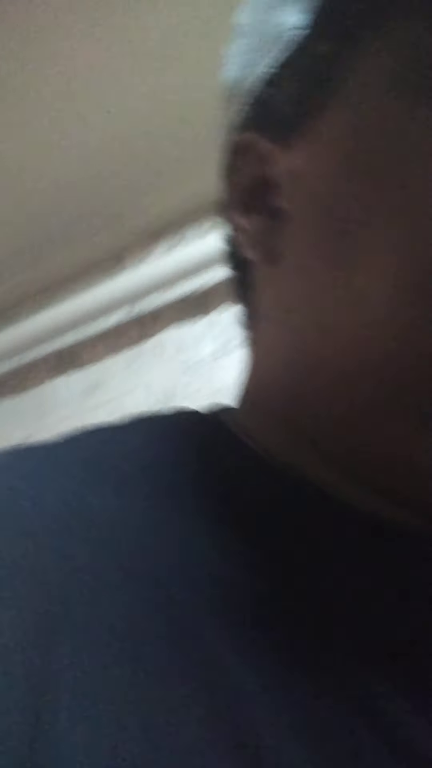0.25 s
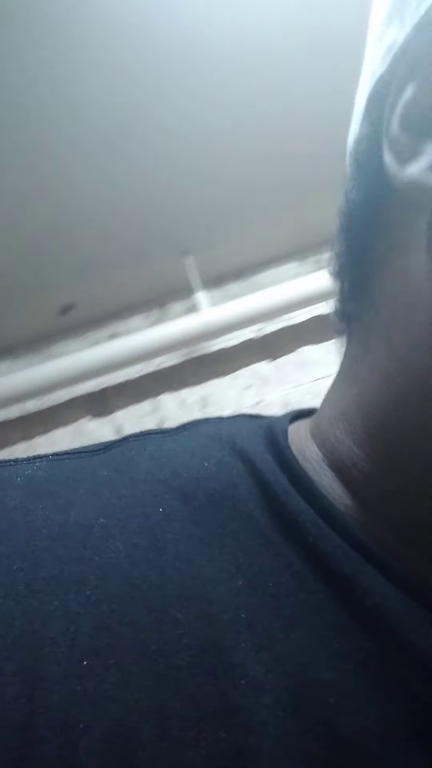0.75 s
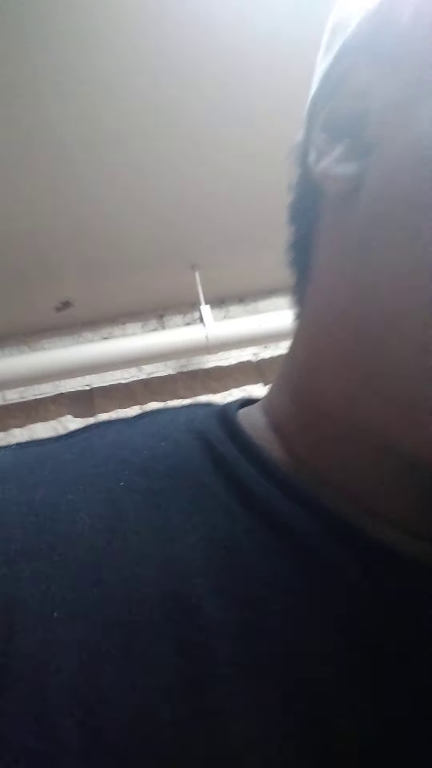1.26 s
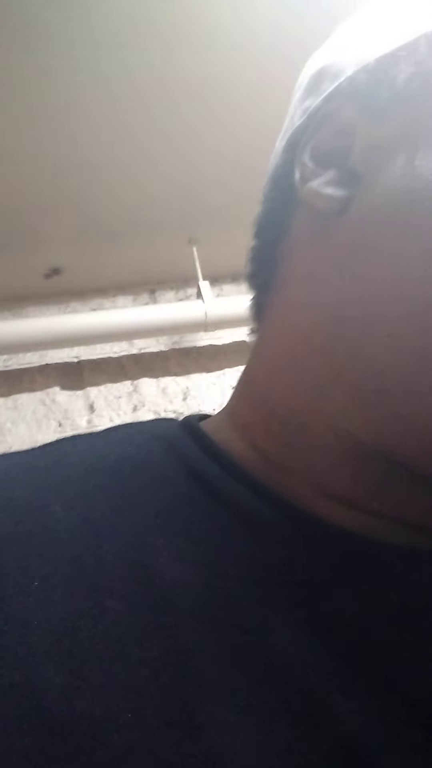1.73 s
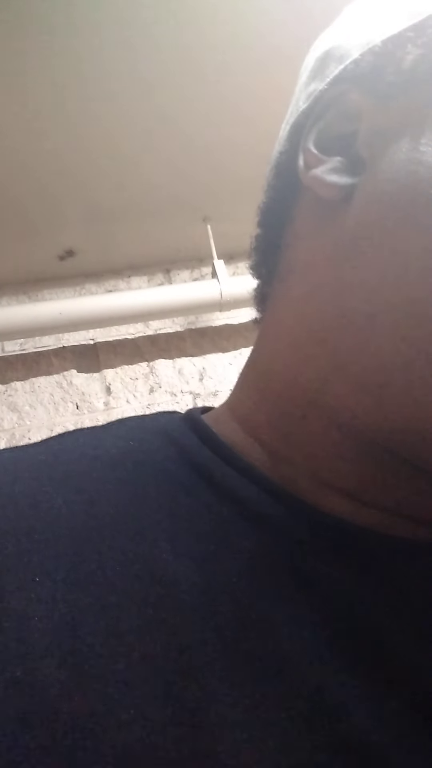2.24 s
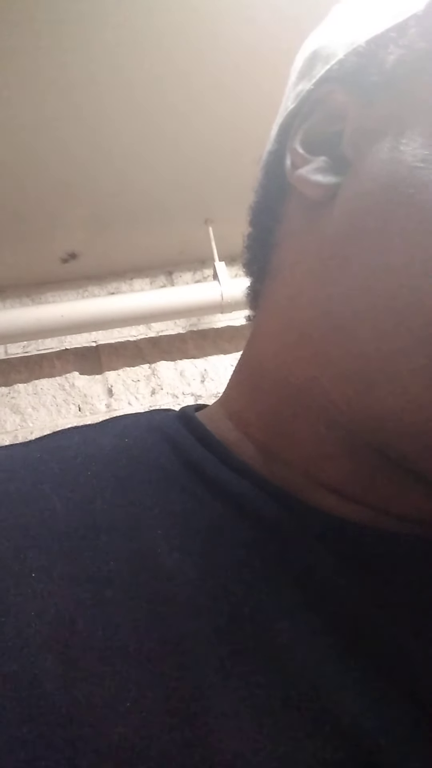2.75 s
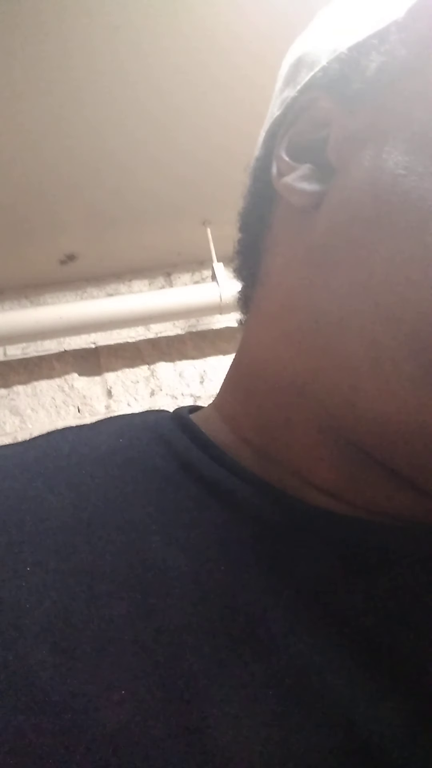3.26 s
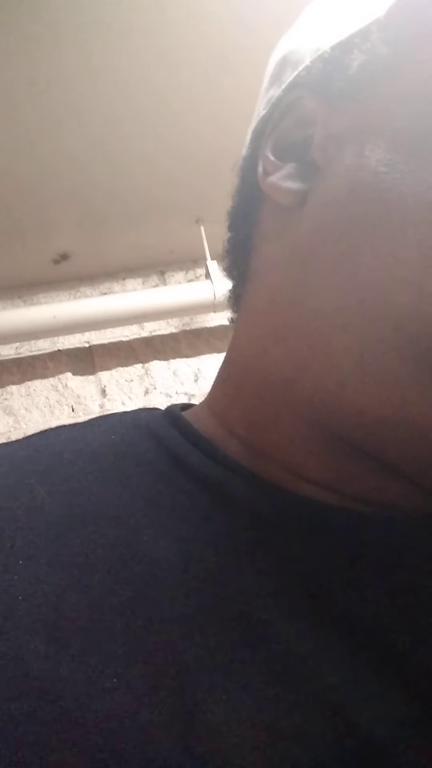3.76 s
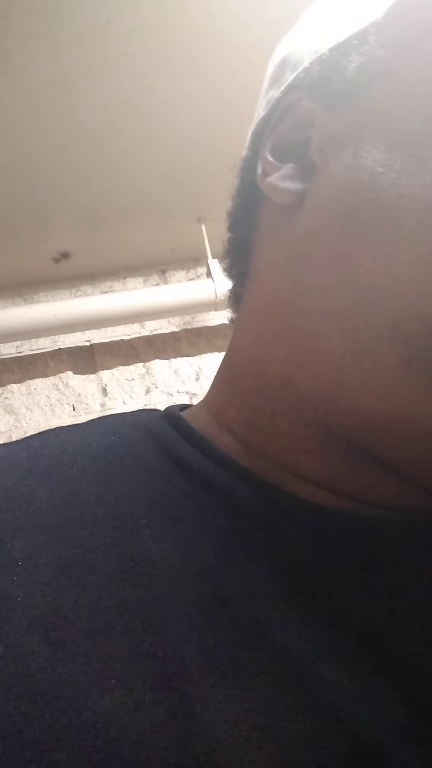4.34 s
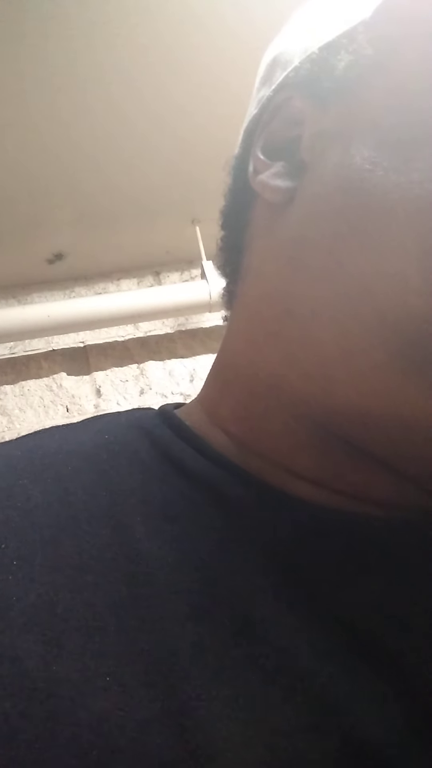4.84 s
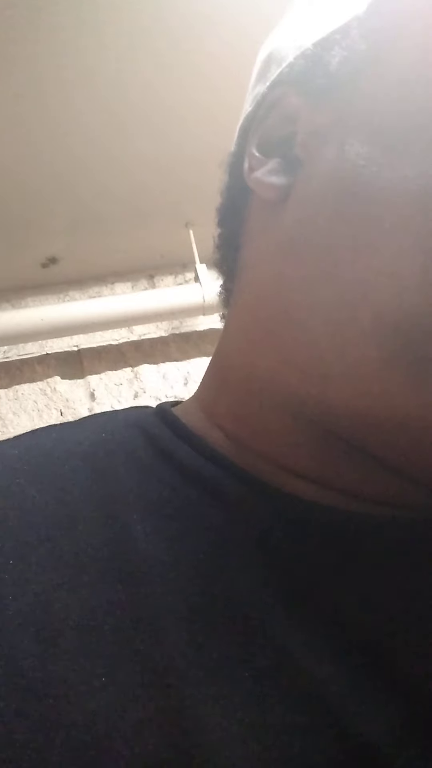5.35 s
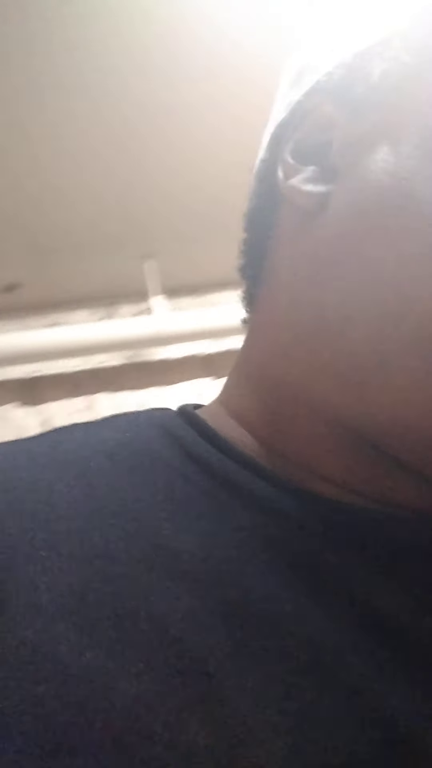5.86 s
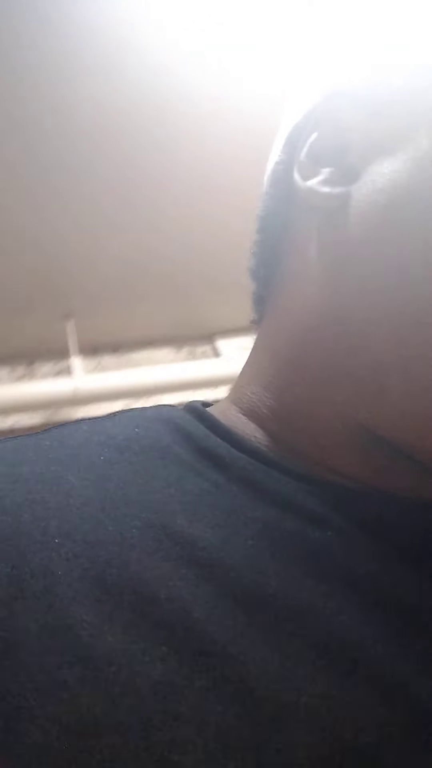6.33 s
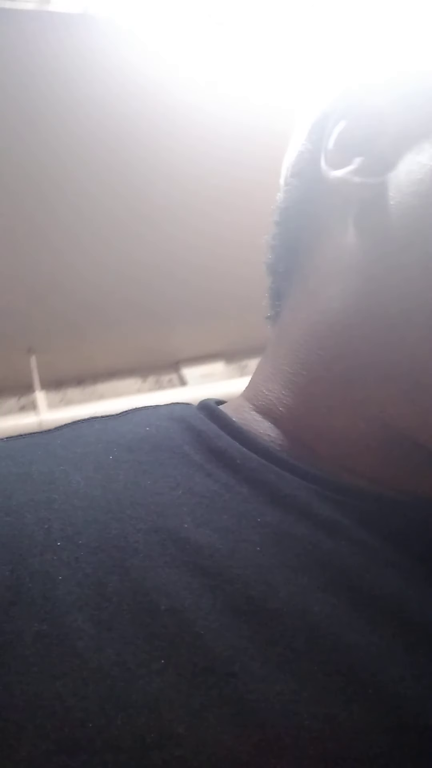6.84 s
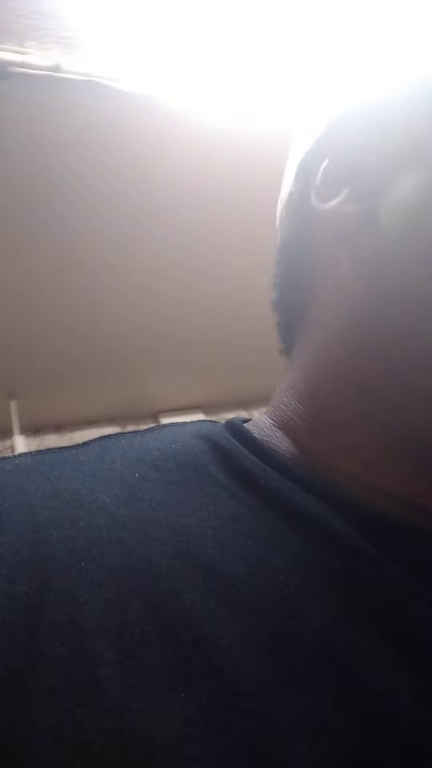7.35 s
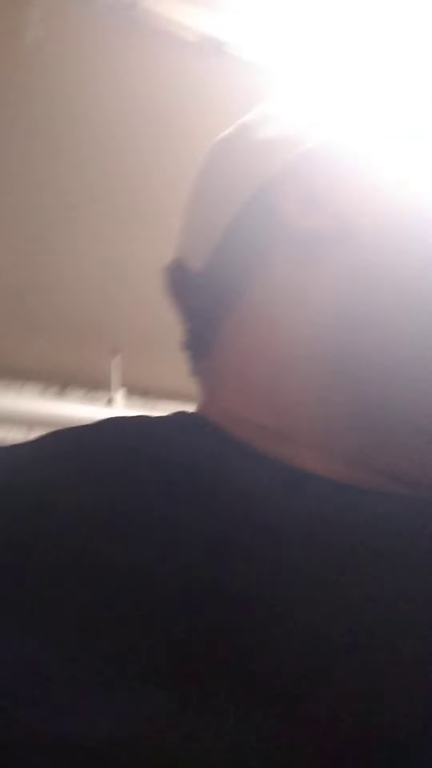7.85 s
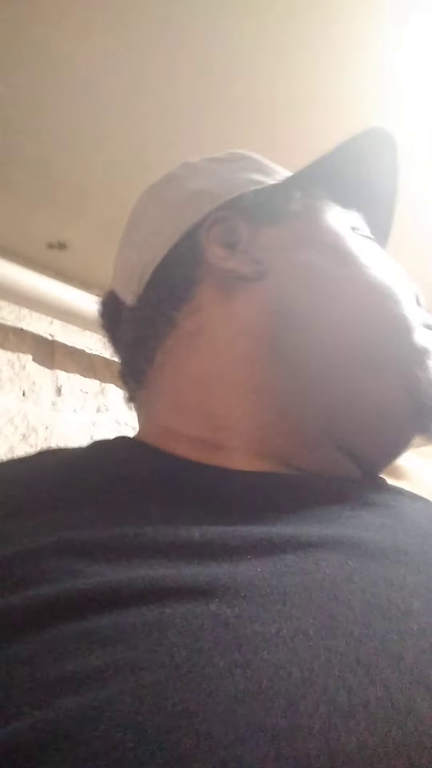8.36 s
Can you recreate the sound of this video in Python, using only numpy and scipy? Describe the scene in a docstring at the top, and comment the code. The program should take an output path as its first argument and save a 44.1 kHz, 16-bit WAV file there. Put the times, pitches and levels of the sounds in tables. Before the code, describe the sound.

Close to a handheld phone indoors, a machine rumbles under muffled fan air. A bucket is set down and pushed, then ice tumbles into it: heavy hollow knocks first, then irregular cube-on-cube clacks and crisp chips, with a metallic flap clanging near the end. The stream stops, leaving the drone, faint rustles and one dull finger tap. The ice's treble leans strongly left, the right side muffled.

```python
"""An ice machine indoors, over a compressor's drone and fan air made of shaped noise.
A plastic bucket lands on the tray with damped tones and is pushed along it; then the auger motor hums.
Cubes tumble as noise bursts and short tones: first they boom in the empty bucket, then clack on each other.
The chute's steel part and flap ring; after the motor come last slips, brushes and a finger's tap on the phone.
The hand-held phone hears it all in stereo, its right port covered and dull."""
import sys
import numpy as np
from scipy import signal
from scipy.fft import rfft, irfft, next_fast_len
from scipy.io import wavfile
from scipy.ndimage import map_coordinates

SR = 44100
rng = np.random.default_rng(int(sys.argv[2]) if len(sys.argv) > 2 else 0)


def dump_mix(stems):
    """Bounce the given channels to the path in sys.argv[1] as a 16-bit WAV at rate SR."""
    frames = np.atleast_2d(stems).T  # one column per channel
    limited = np.clip(frames, -1, 1)  # hard clip at full scale
    pcm = np.round(limited * 32767).astype(np.int16)
    wavfile.write(sys.argv[1], SR, pcm)


N = 379083
T = np.arange(N) / SR

# Blows on the bucket: (time [s], knock level [dB], clack re knock [dB], tick re knock [dB])
HITS = [(0.356, -37, -41, -9), (0.609, -25.5, -19, -18.5), (0.747, -19.5, -17.5, -33),
        (0.795, -21.5, -26, -20.5), (0.948, -30, -31, -17.5), (1.553, -29.5, -19, -46),
        (1.599, -25.5, -7, -2), (1.627, -27, -13, -6), (1.663, -26, -4, -7), (1.908, -5, -22, -23.5),
        (2.109, -5, -19.5, -23), (2.229, -3, -17.5, -21), (2.282, -3.5, -16.5, -22.5),
        (2.393, -10, -10, -14.5), (2.566, -8, -17.5, -16.5), (2.621, -6.5, -12.5, -16.5),
        (2.66, -7.5, -20, -26), (2.757, -6.5, -18, -18.5), (2.828, -8, -10, -26), (2.879, -10, -9, -32),
        (2.996, -11, -14, -24), (3.126, -15, -6, -11), (3.171, -20, -12, -15), (3.229, -12, -7.5, -11),
        (3.274, -20, -2, -52), (3.378, -8.5, -12.5, -18), (3.483, -13.5, -14.5, -13.5),
        (3.708, -17, -9.5, -18), (3.824, -13, -13, -15.5), (3.947, -18, -5.5, -37), (4.081, -18.5, -9, -15),
        (4.18, -16, -12, -9.5), (4.213, -16.5, -5, -15.5), (4.257, -17, -6, -13.5), (4.32, -29, -7, -16),
        (4.524, -14, -12, -13.5), (4.589, -24, -13, -8.5), (4.688, -17, -9, -12), (4.725, -31, -1, -24),
        (4.776, -25.5, -14, -9), (4.816, -21.5, -9.5, -8), (4.858, -28, -13, -13), (4.94, -22, -12.5, -23),
        (5.083, -20.5, -15, -9.5), (5.171, -30, -13, -0.5), (5.324, -36, 1.5, -3), (5.434, -20, -8, -9),
        (5.506, -25.5, -5, -4.5), (5.561, -18, -7, -14), (5.627, -27.5, 2, -11), (5.683, -21.5, -7, -13),
        (5.734, -21.5, -10.5, -13), (5.797, -20, -6, -14.5), (6.022, -26, -12, -17), (6.145, -28, -4, -29),
        (6.181, -32, -10, -15), (6.233, -30, -11, -18), (6.263, -23.5, -2.5, -17), (6.343, -18, -14, -36),
        (6.420, -14, -20, -7.5), (6.534, -29.5, -5, -2.5), (6.642, -22.5, -15, -7),
        (6.663, -18.5, -13.5, -9), (6.809, -33, -23, -25), (7.117, -37, -12, -23), (7.334, -39, -19, -30)]
# Modes of the bucket wall: (frequency [Hz], width [Hz], level [dB])
BUCKET = [(618, 90, -10.5), (705, 74, -9), (984, 64, -4.5), (1232, 190, 0), (1548, 160, 0), (1895, 19, -27),
          (2367, 156, 0.5), (3320, 140, -8), (3810, 120, -2)]
# Spectrum of scraping and ticking ice: (frequency [Hz], level [dB])
RASP = [(2350, -12), (4000, -8), (4530, -6.5), (6030, -6), (6560, -9.5), (8290, -13), (11900, -2.5),
        (15100, -9), (15600, -4)]
# Likeness of the two ports for the ice: (frequency [Hz], left-right likeness [0 to 1; below 0 counts as 0])
ICE_ALIKE = [(60, 1), (130, 1), (290, 0.94), (640, 0.51), (1410, 0.095), (3100, -0.1), (6820, -0.83),
             (15000, -0.96)]
# Balance of the ports for the ice: (frequency [Hz], left minus right [dB])
ICE_LEFT = [(60, 5), (110, -0.5), (200, -1), (380, -0.5), (700, -4.5), (1290, -1.5), (2380, 9), (4400, 12),
            (8120, 24.5), (15000, 30.5)]


def amp(db):
    """Decibels to amplitude."""
    return 10 ** (np.asarray(db) / 20)


def unit(x):
    """Scale to an rms of one."""
    return x / np.sqrt(np.mean(x ** 2) + 1e-20)


def along(points, hz):
    """Read (Hz, value) points on a logarithmic frequency axis."""
    f, v = np.transpose(points)
    return np.interp(np.log(hz + 1), np.log(f + 1), v)


def curves(rows):
    """One value per sample for each column after the time."""
    s, *cols = np.transpose(rows)
    return [np.interp(T, s, c) for c in cols]


def wobble(rate):
    """A smooth random curve with rate knots a second."""
    knots = rng.standard_normal(int(N * rate / SR) + 4)
    return map_coordinates(knots, [T * rate])


def filtered(x, response):
    """Shape x by a response of frequency."""
    m = next_fast_len(N + SR // 2)
    return irfft(rfft(x, m) * response(np.fft.rfftfreq(m, 1 / SR)), m)[..., :N]


def modes(table):
    """Causal response of (Hz, width, dB) resonances with alternating sign."""
    def response(f):
        return sum((-1) ** k * amp(db) * 1j * f * w / (c * c - f * f + 1j * f * w)
                   for k, (c, w, db) in enumerate(table))
    return response


def ports(colour, alike, left_db):
    """Coloured noise at the two microphone ports; the mean of the two has unit power."""
    m = next_fast_len(N)
    hz = np.fft.rfftfreq(m, 1 / SR)
    # The share of side against mid sets how alike the ports are
    turn = np.arccos(np.clip(along(alike, hz), 0, 1)) / 2
    noise = rfft(rng.standard_normal((2, m))) * unit(np.abs(colour(hz)))
    mid, side = noise * [np.cos(turn), np.sin(turn)]
    right = amp(-along(left_db, hz))
    scale = 2 / np.sqrt(1 + right ** 2 + 2 * right * np.cos(2 * turn))
    return irfft(np.array([mid + side, (mid - side) * right]) * scale, m)[:, :N]


def dying(times, db, t60):
    """Power that jumps at each time and falls by 60 dB in t60 seconds."""
    kicks = np.bincount((np.asarray(times) * SR).astype(int), amp(db) ** 2, N)[:N]
    return signal.lfilter([1], [1, -amp(-120 / (t60 * SR))], kicks)


def bursts(times, db, crack_s, tail_s, tail_db, rise_s=0.003):
    """Power of blows: a short crack, then a longer tail from bucket and walls, with a softened onset."""
    power = dying(times, db, crack_s) + dying(times, np.asarray(db) + tail_db, tail_s)
    keep = np.exp(-1 / (rise_s * SR))
    return signal.lfilter([1 - keep], [1, -keep], power)


def jostle(count, crack_s, tail_db, steady):
    """Power near 1 of many small random collisions: most faint, few strong, over a steady share."""
    draws = rng.random((count, 2))
    strength_db = -3 * np.log(draws[:, 1] + 0.012)
    power = bursts(draws[:, 0] * N / SR, strength_db, crack_s, 0.19, tail_db)
    return steady + (1 - steady) * power / power.mean()


def clinks(times, db, hz, cycles):
    """Short damped tones, one a contact, that fall to 1/e in the given number of cycles."""
    draws = rng.random((len(times), 2))
    t = np.arange(1400) / SR
    fade = amp(db)[:, None] * np.exp(-t * hz[:, None] / cycles)
    wave = fade * np.sin(2 * np.pi * hz[:, None] * t) * (1 - np.exp(-t / 0.0013))
    # Each contact comes up to 4 ms late
    at = ((times + .004 * draws[:, 0])[:, None] * SR).astype(int) + np.arange(len(t))
    left = amp(along(ICE_LEFT, hz) / 2)[:, None]
    # Each tone reaches the far port on its own path
    delay = (0.0002 * SR * draws[:, 1:]).astype(int)
    return np.array([np.bincount((at + d).ravel(), (wave * gain).ravel(), N + SR)[:N]
                     for d, gain in [(0, left), (delay, 1 / left)]])


def rings(rows, attack_s, split, blur):
    """Damped tones; a weaker close neighbour makes each one beat, and drifting phase blurs it."""
    size = SR // 2
    out, t = np.zeros((2, N + size)), np.arange(size) / SR
    for s, db, hz, t60 in rows:
        a, b, lag = rng.random(3)
        drift = blur * np.cumsum(rng.standard_normal(size)) / np.sqrt(SR)
        phase = 2 * np.pi * hz * t + drift
        mate = 0.3 * np.sin(phase * (1 + split * (a - .5)) + 2 * np.pi * b)
        fade = amp(db - 60 * t / max(t60, .02)) * (1 - np.exp(-t / attack_s))
        fade *= np.minimum(20 * (.5 - t), 1)  # closes over the last 50 ms
        left, right = np.sin(phase) + mate, np.sin(phase + 0.79 * lag) + 0.29 * mate
        out[:, round(s * SR):][:, :size] += fade * [left, right]
    return out[:, :N]


def struck(table, hits):
    """Every hit rings all modes of a metal part; the covered port loses the high ones."""
    out = np.zeros((2, N))
    for hz, level, t60 in table:
        rows = [(s, db + level, hz, t60) for s, db in hits]
        gain_db = [[4], [4 - max(along(ICE_LEFT, hz), 4)]]
        out += rings(rows, attack_s=.002, split=.01, blur=3) * amp(gain_db)
    return out


def room():
    """Steady machinery fills the passage: fan air with a narrow drone, and a rumble that comes in lumps."""
    # Background levels: (time [s], rumble level [dB], air level [dB])
    levels = [(0.0, -47.5, -50), (8.6, -51.5, -51.5)]
    # Spectrum of the fan air: (frequency [Hz], level [dB])
    fan_air = [(70, -40), (110, -6), (250, -7), (400, -14), (630, -18), (1000, -24), (1600, -31),
               (2500, -33), (4000, -43), (5500, -55), (8000, -60), (11000, -45), (15800, -48)]
    # A compressor's narrow drone in the air: (frequency [Hz], width [Hz], level [dB])
    tone = (345, 14, 4)
    # Spectrum of the compressor's rumble: (frequency [Hz], level [dB])
    drone = [(25, -14), (40, -4), (60, 5.5), (85, 0), (130, -7), (200, -41)]
    # Likeness of the ports for the room: (frequency [Hz], left-right likeness [0 to 1; below 0 counts as 0])
    alike = [(60, 0.72), (130, 0.72), (290, 0.77), (640, 0.28), (1410, 0.09), (3100, 0.1), (6820, -0.01),
             (15000, -0.0)]
    # Balance of the ports for the room: (frequency [Hz], left minus right [dB])
    left_db = [(60, -2.0), (110, -3.0), (200, -1.5), (380, -3.5), (700, -2.5), (1290, -0.5), (2380, 6.0),
               (4400, 8.0), (8120, 12.0), (15000, 11.5)]
    rumble_db, air_db = curves(levels)
    peak = modes([tone])
    air = ports(lambda hz: amp(along(fan_air, hz)) * (1 + np.abs(peak(hz))), alike, left_db)
    rumble = ports(lambda hz: amp(along(drone, hz)), alike, left_db)
    return amp(rumble_db + 2.7 * wobble(8)) * rumble + amp(air_db + 0.5 * wobble(4.5)) * air


def motor():
    """The auger motor: mains hum and a case tone, each a sine with wandering level and phase."""
    # The motor's switching envelope: (time [s], level [dB])
    running = [(1.5, -60), (1.6, 0), (6.9, 0), (7.1, -60)]
    # Hum partials: (frequency [Hz], level [dB])
    partials = [(61, -50), (122, -49), (203, -42)]
    hum = np.zeros(N)
    for hz, db in partials:
        level_db = db + 3.5 * wobble(14)
        phase = 3.5 * wobble(12)  # radians
        hum += amp(level_db) * np.sin(2 * np.pi * hz * T + phase)
    return amp(curves(running)[0]) * hum


def tap():
    """A finger taps the phone: a soft push whose pitch sinks at once from 576 to 96 Hz."""
    start_s, level_db, sink_s, t60_s = 7.7085, -32, .006, .035
    t = np.maximum(T - start_s, 0)
    phase = 2 * np.pi * 480 * (.2 * t + sink_s * (1 - np.exp(-t / sink_s)))
    # Holds for 8 ms, then dies
    return amp(level_db - 60 * np.maximum(t - .008, 0) / t60_s) * np.sin(phase)


def steel_part():
    """A thin steel part of the chute rings high when struck."""
    # Modes of the steel: (frequency [Hz], level [dB], t60 [s])
    steel = [(1700, 0, .7), (7140, -8, .25), (7670, -13, .4), (8915, -7, .2), (10290, -4, .25),
             (13250, -5, .35)]
    # Blows on it: (time [s], level [dB])
    blows = [(1.66, -44), (4.368, -39), (5.41, -46), (6.03, -42), (6.665, -45)]
    return struck(steel, blows)


def chute_flap():
    """The chute's flap rings lower when struck."""
    # Modes of the flap: (frequency [Hz], level [dB], t60 [s])
    flap = [(840, -8, .18), (1352, 0, .28), (2830, -13, .45), (4600, -24, .4)]
    # Blows on it: (time [s], level [dB])
    blows = [(6.02, -36), (6.422, -19), (6.642, -29), (6.668, -30)]
    return struck(flap, blows)


def drags(fall):
    """Power of the bucket's pushes along the tray: a straight rise and fall in dB."""
    # Pushes: (time of peak [s], rumble level [dB])
    pushes = [(0.81, -27.5), (1.689, -22)]
    rise = 142  # dB per s; the fall, also in dB per s, is set by the caller
    return sum(amp(db - np.maximum(rise * (s - T), fall * (T - s))) ** 2 for s, db in pushes)


def thuds():
    """Power of dull knocks on the housing; louder ones last longer."""
    # Knocks: (time [s], level [dB])
    knocks = [(0.355, -27.5), (0.609, -13), (0.759, -35), (0.949, -26.5), (1.599, -13.5), (1.8, -18.5),
              (3.703, -18.5), (3.824, -27), (5.168, -20.5), (6.18, -20.5), (6.42, -9), (6.569, -23),
              (6.659, -22), (7.116, -34), (7.329, -30)]
    power = np.zeros(N)
    for s, db in knocks:
        t60 = max(0.21 + 0.025 * (db + 25.5), .06)  # 0.21 s at -25.5 dB, 25 ms more per dB
        power += bursts([s], [db - 10.0], t60, 0.49, -6.5, 0.0074)
    return power


def booms():
    """The bucket's landing and its hollow note when empty, a little off pitch at each blow."""
    # The bucket lands on the tray, edge first: (time [s], level [dB], frequency [Hz], t60 [s])
    set_down = [(0.612, -17, 248, 0.3), (0.627, -14, 248, 0.3)]
    # Blows that sound the hollow note: (time [s], level [dB])
    blows = [(1.913, -4), (2.052, -13.5), (2.227, -14), (2.289, -14), (2.362, -12), (2.404, -7.5),
             (2.506, -20), (2.569, -10), (2.658, -9.5), (2.86, -14.5), (2.957, -13), (3.123, -25),
             (3.225, -42)]
    boom_hz, boom_t60 = 308.2, 0.37
    rows = [(s, db, boom_hz * (1 + 0.018 * rng.standard_normal()), boom_t60) for s, db in blows]
    return rings(list(set_down) + rows, attack_s=0.0023, split=0.246, blur=0.83) * amp([[-1.2], [1.2]])


def cubes():
    """Ice on ice: a dry noise snap, one clear tone and a few scattered ones."""
    # Cube on cube: (time [s], level [dB], strongest tone [Hz])
    contacts = [(2.376, -22, 3960), (2.7437, -19.5, 4030), (3.2286, -14.5, 4270), (3.6232, -34, 13500),
                (3.7282, -21, 4260), (3.9235, -21, 14400), (4.3675, -28.5, 13000), (4.5043, -27, 14900),
                (4.5757, -25.5, 6000), (4.6395, -21.5, 10700), (4.6922, -17.5, 10800), (5.0599, -45, 4430),
                (5.1711, -18.5, 6900), (5.409, -31.5, 11600), (5.5876, -22.5, 13000), (5.9349, -32, 14300),
                (5.9728, -36.5, 4070), (6.0337, -25, 5430), (6.104, -29, 12100), (6.181, -21, 4470),
                (6.1972, -16, 11600), (6.217, -22, 5390), (6.2512, -23.5, 4770), (6.2941, -21.5, 4740),
                (6.534, -21, 5430), (6.563, -30, 13600), (6.9097, -32, 10700)]
    s, db, hz = np.transpose(contacts)
    draws = rng.random((len(s), 3, 2))
    extra_db = (db[:, None] - 15.5 - 8 * draws[..., 0]).ravel()
    extra_hz = 2500 * 4.3 ** draws[..., 1].ravel()
    extra = clinks(np.repeat(s, 3), extra_db, extra_hz, cycles=37)
    snap_power = bursts(s, db - 6.5, 0.012, 0.25, -7, 0.00075)
    snap = np.sqrt(snap_power) * ports(lambda f: amp(along(RASP, f)), ICE_ALIKE, ICE_LEFT)
    return snap + extra + clinks(s, db - 11, hz, cycles=31)


def last_slips():
    """Power of the last slips of ice and brushes on the phone: a dry rustle and its clack."""
    # Rustles: (time [s], level [dB], clack re rustle [dB])
    rows = [(7.0145, -35, -13), (7.0594, -56, -5), (7.1156, -41, -7), (7.1955, -50, -14), (7.3344, -62, -5),
            (7.665, -56, -19), (8.0825, -51.5, -25), (8.27, -48, -1)]
    s, db, clack = np.transpose(rows)
    rustles = bursts(s, db - 2, 0.046, 0.42, -9.5, 0.0037)
    slips = bursts(s, db + clack - 5.5, .05, 0.82, -7.5, 0.002)
    return rustles, slips


def ice_flow():
    """Levels of the tumbling stream, nearly silent before and after it."""
    # Tumbling ice: (time [s], knocking in the bucket [dB], rasp in the chute [dB])
    flow = [(1.48, -70, -68), (1.6, -44, -39), (1.71, -48, -47), (1.82, -58, -56), (2.0, -37, -67),
            (2.34, -28.5, -41.5), (2.66, -26.5, -47), (2.85, -23.5, -30.5), (3.04, -22, -32),
            (3.42, -34, -46), (3.55, -43, -63), (3.76, -38.5, -44.5), (3.89, -30.5, -36),
            (4.08, -36.5, -38.5), (4.32, -44, -55), (4.6, -39.5, -42), (5.07, -43, -51.5), (5.46, -46, -61),
            (5.62, -31.5, -33.5), (5.83, -52, -63), (6.07, -37, -43.5), (6.3, -34.5, -39),
            (6.7, -40, -49.5), (7.45, -69, -77)]
    before, after = (flow[0][0] - .02, -90, -90), (flow[-1][0] + .15, -90, -90)
    return curves([before, *flow, after])


def wall_notes(count, spread):
    """Random wall modes, pulled off pitch by the cube that touches: Hz and dB."""
    draws = rng.random((count, 3))
    hz, _, db = np.array(BUCKET)[(draws[:, 0] * len(BUCKET)).astype(int)].T
    return hz * (1 + spread * (draws[:, 1] - .5)), db - 8 * draws[:, 2]


def ice_notes(knock_db, rasp_db):
    """Each contact sets off a short tone: bucket walls under the cubes, and high dry chips."""
    s, db, *_ = np.transpose(HITS)
    ring_hz = 1278 * (1 + 0.092 * (rng.random(len(s)) - .5))
    main = clinks(s, db - 7.5, ring_hz, cycles=11.3)
    other_hz, other_db = wall_notes(count=2 * len(s), spread=0.089)
    others = clinks(np.repeat(s, 2), np.repeat(db, 2) + other_db - 8, other_hz, cycles=18)

    small_s = rng.random(900) * (N - 1) / SR
    small_hz, small_db = wall_notes(count=900, spread=0.21)
    small_db = small_db + knock_db[(small_s * SR).astype(int)] + 7
    small = clinks(small_s, small_db, small_hz, cycles=10)

    chip_s = rng.random(700) * (N - 1) / SR
    chip_hz = 3500 * 2 ** (1.3 * rng.random(700))
    chip_db = rasp_db[(chip_s * SR).astype(int)] - 12 * rng.random(700) + 9
    chips = clinks(chip_s, chip_db, chip_hz, cycles=7)
    return main + others + small + chips


def ice_noise(knock_db, rasp_db):
    """Five noise layers from rumble to rasp: single loud cubes over a stream of small collisions."""
    # Rumble of the housing: (frequency [Hz], level [dB])
    rumble_colour = [(41, -54), (70, -11), (222, 4.5), (545, -11), (770, -16.5), (842, -10.5),
                     (1160, -22.5), (1270, -52), (1370, -23), (1500, -21), (1950, -43), (3300, -120)]
    # Air and floor of the bucket: (frequency [Hz], width [Hz], level [dB])
    hollow_modes = [(301.4, 11.2, 0), (351, 29, -6.5), (469.4, 45, -5)]
    # Spectrum of the knocks: (frequency [Hz], level [dB])
    knock_colour = [(290, -37), (500, 1.5), (1030, -5.5), (1260, -6), (1660, -13), (1900, -6),
                    (2470, -20.5), (4180, -120)]
    # Spectrum of the clacks: (frequency [Hz], level [dB])
    clack_colour = [(1000, -28), (1700, -5), (2310, -3), (2950, 0), (3840, -5.5), (5500, -15.5),
                    (7150, -59), (12100, -120)]
    s, db, clack, tick = np.transpose(HITS)
    crowd = jostle(count=1200, crack_s=0.035, tail_db=-2, steady=0.1)
    fine = jostle(count=1500, crack_s=0.053, tail_db=-20.0, steady=0.076)
    rustles, slips = last_slips()
    drag = drags(fall=71)
    wall_modes = modes(BUCKET)

    def walls(hz):
        return 1 + 1.3 * np.abs(wall_modes(hz))

    # The housing follows the knocking only in part
    rumble_db = -24.5 + 0.37 * knock_db + np.minimum(knock_db + 54, 0)
    rumble = amp(rumble_db) ** 2 + drags(fall=195) + thuds()

    # From 1.8 s the hollow sound fades by 5 dB per s as the bucket fills
    hollow_db = knock_db + np.clip(7.5 - 5 * (T - 1.8), -10, 7.5)
    hollow = (amp(hollow_db) ** 2 + amp(-7.5) ** 2 * drag) * crowd
    hollow += bursts(s, db - 16.5, 0.05, 0.53, -2.4)

    knock = (amp(knock_db) ** 2 + amp(-17.5) ** 2 * drag) * crowd + 3.6 * slips
    knock += bursts(s, db - 6.5, 0.019, 0.37, -11.5)

    # The clack's level is drawn from both knocking and rasp
    clack_db = -4.5 + knock_db + 0.32 * (rasp_db - knock_db)
    clacks = amp(clack_db) ** 2 * (crowd + fine) / 2 + slips
    clacks += bursts(s, db + clack + 0.5, 0.024, 0.44, -11.5, 0.0042)

    rasp = amp(rasp_db) ** 2 * fine + rustles
    rasp += bursts(s, db + tick + 1.5, 0.016, 0.48, -9.0, 0.00073)

    layers = [(rumble, lambda hz: amp(along(rumble_colour, hz))),
              (hollow, modes(hollow_modes)),
              (knock, lambda hz: amp(along(knock_colour, hz)) * walls(hz)),
              (clacks, lambda hz: amp(along(clack_colour, hz)) * walls(hz)),
              (rasp, lambda hz: amp(along(RASP, hz)))]
    return sum(np.sqrt(power) * ports(colour, ICE_ALIKE, ICE_LEFT) for power, colour in layers)


def ice():
    """The ice tumbling into the bucket: collision noise and contact tones share the stream's levels."""
    knock_db, rasp_db = ice_flow()
    return ice_noise(knock_db, rasp_db) + ice_notes(knock_db, rasp_db)


def scene():
    """Background, machine parts, bucket and ice together."""
    background = room() + motor() + tap()
    chute = steel_part() + chute_flap()
    return background + chute + booms() + cubes() + ice()


def record(dry):
    """The phone drops the deepest bass and all above its band limit; the covered port hears treble later."""
    top_hz, bass_hz, right_late_s = 15850, 36, .00023

    def response(hz):
        turns = hz ** 3 / (hz ** 2 + 1500 ** 2) * np.array([[0], [right_late_s]])
        late = np.exp(-2j * np.pi * turns)
        return late * (hz < top_hz) / np.sqrt(1 + (bass_hz / (hz + 1)) ** 12)

    return filtered(dry, response)


dry = scene()
out = record(dry)
dump_mix(out)
```